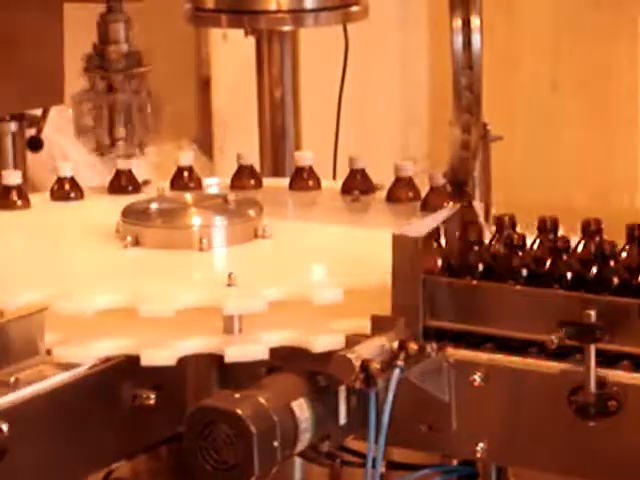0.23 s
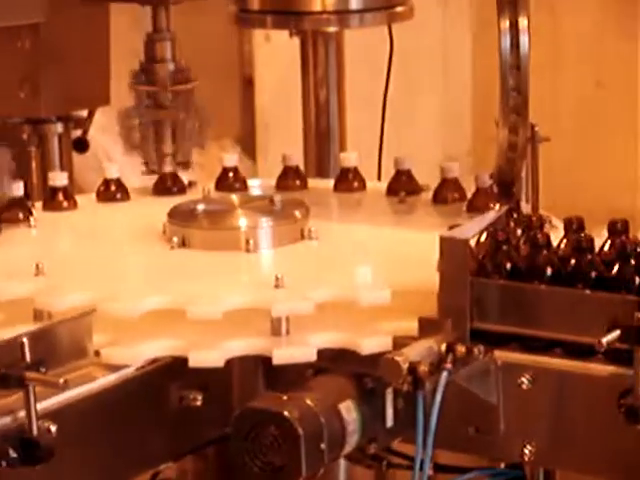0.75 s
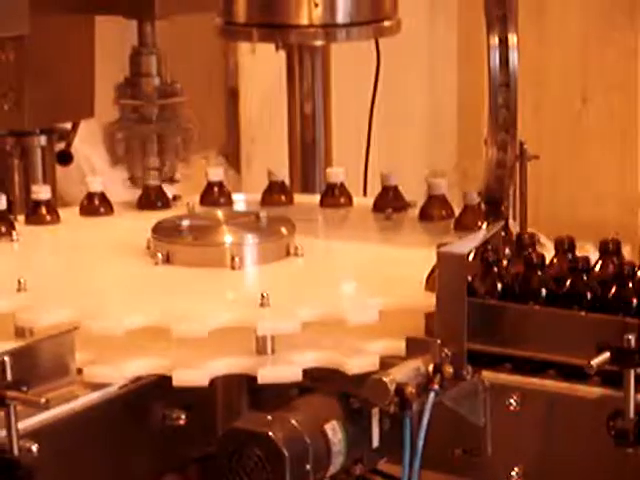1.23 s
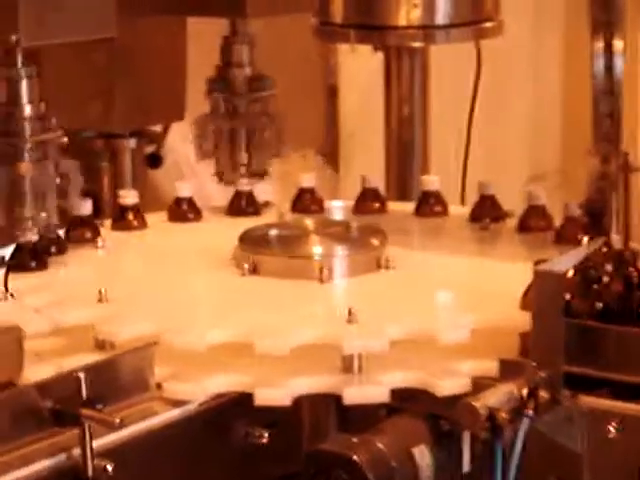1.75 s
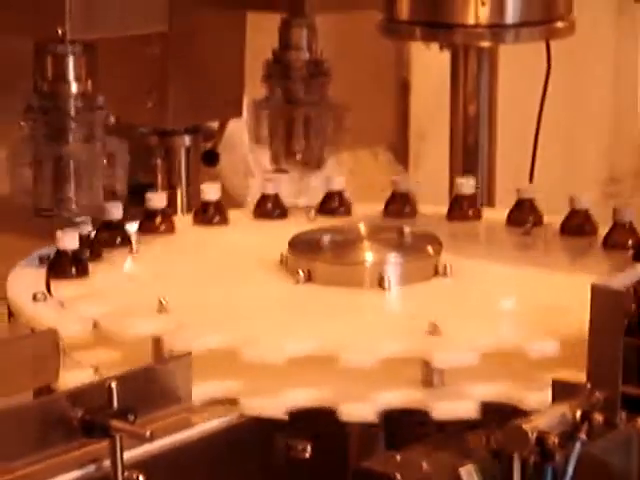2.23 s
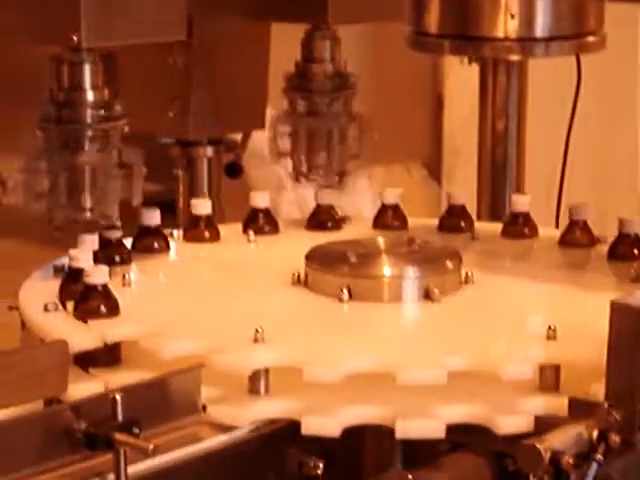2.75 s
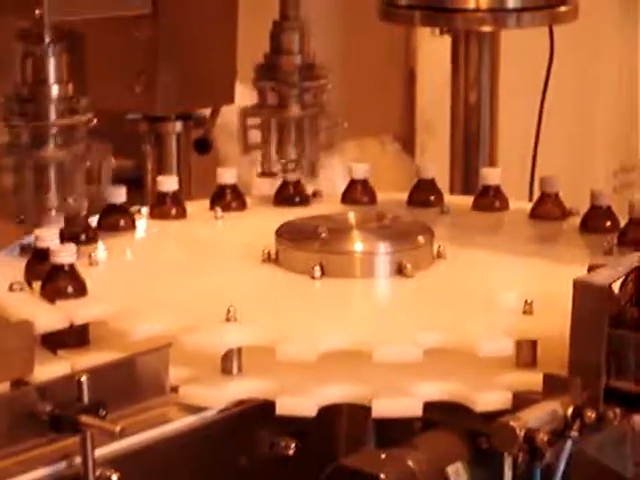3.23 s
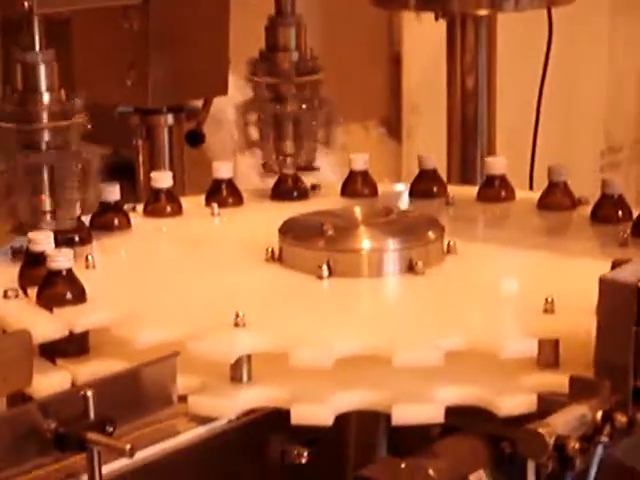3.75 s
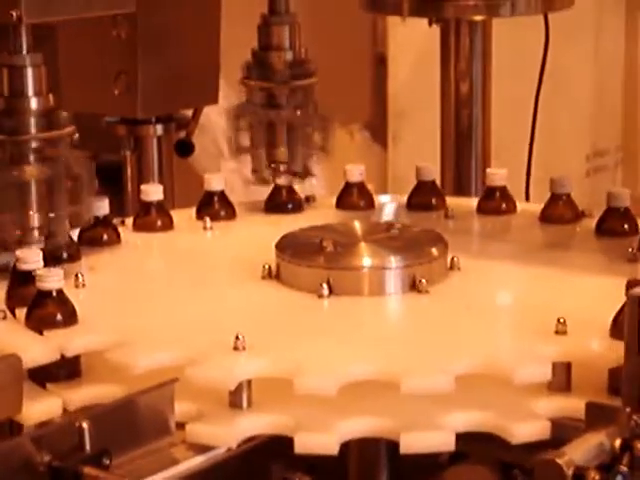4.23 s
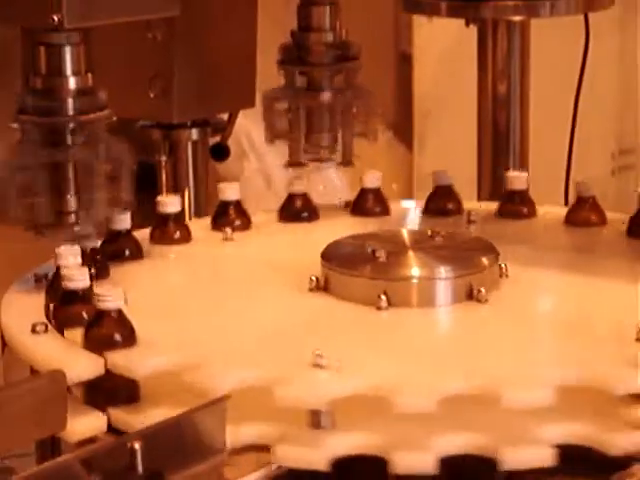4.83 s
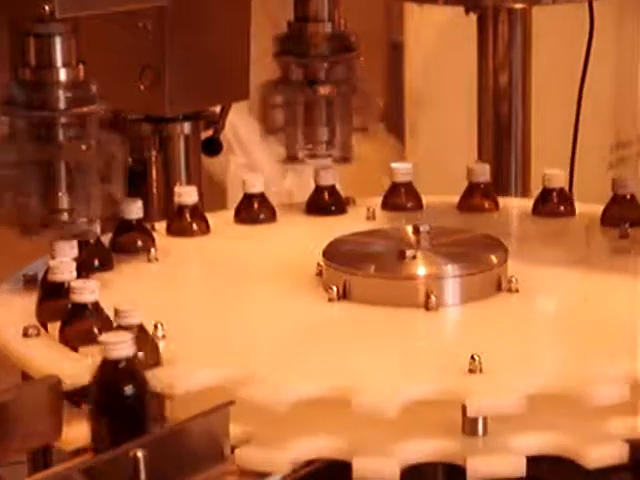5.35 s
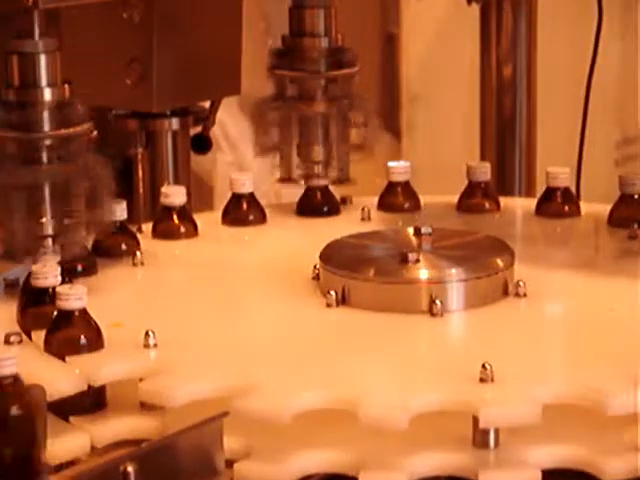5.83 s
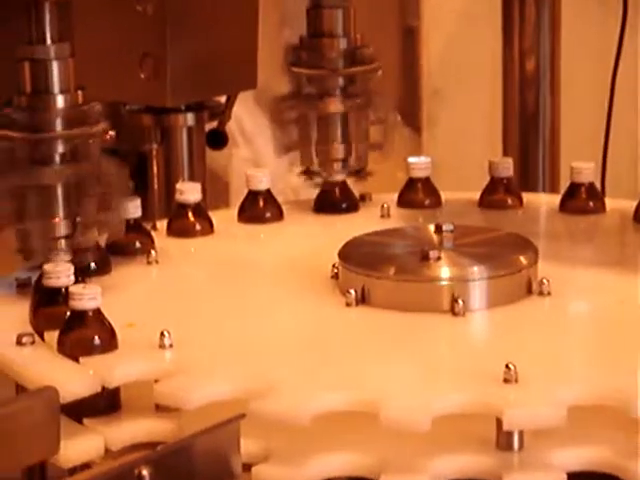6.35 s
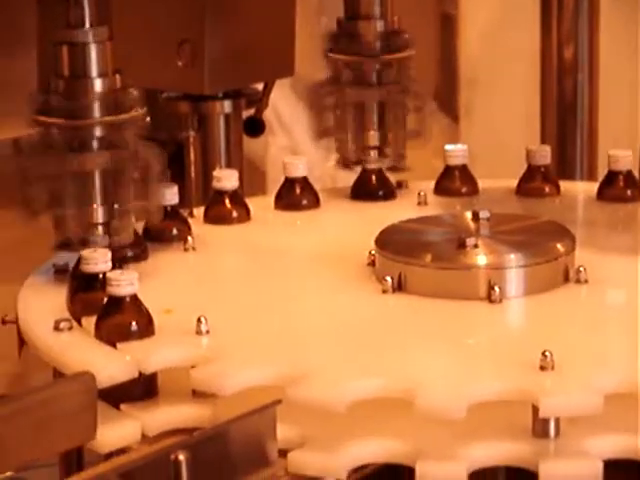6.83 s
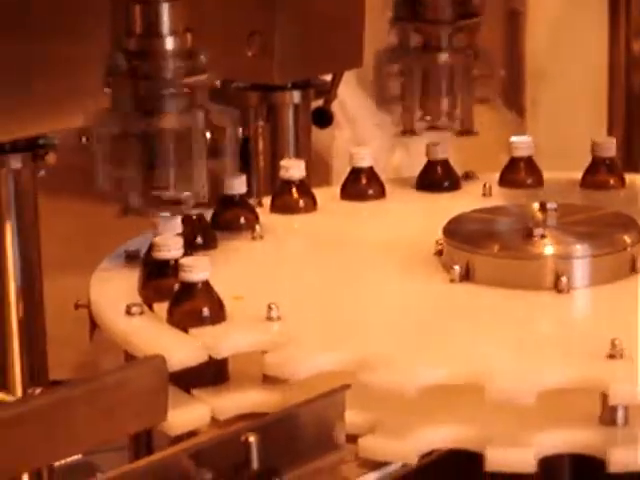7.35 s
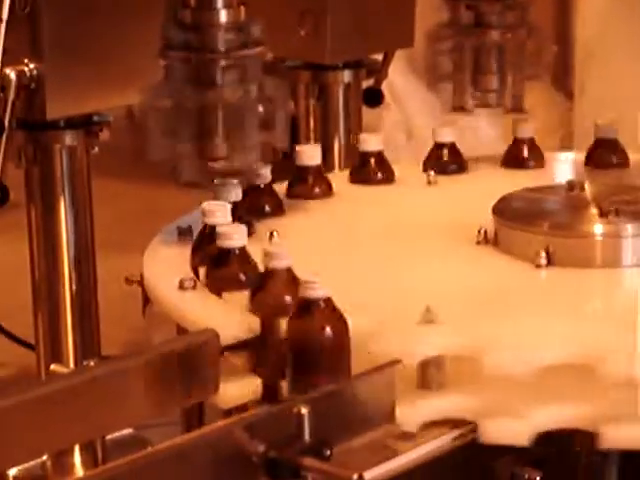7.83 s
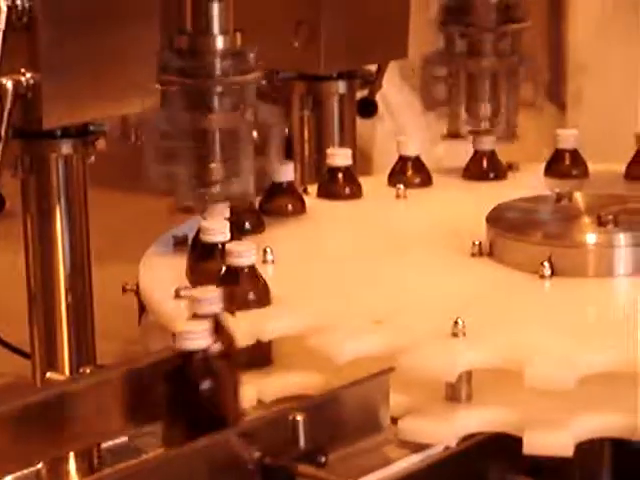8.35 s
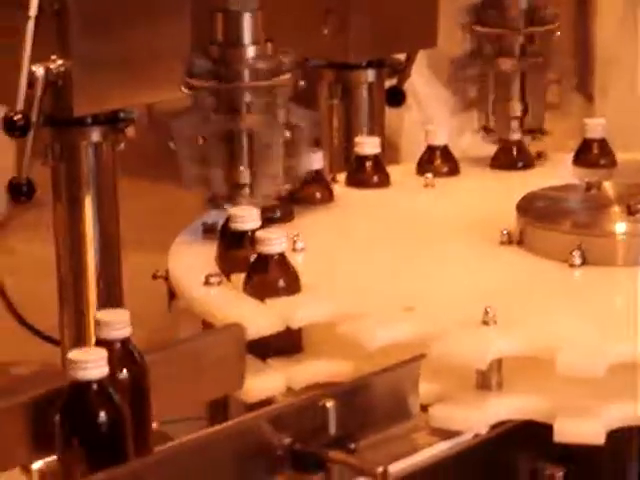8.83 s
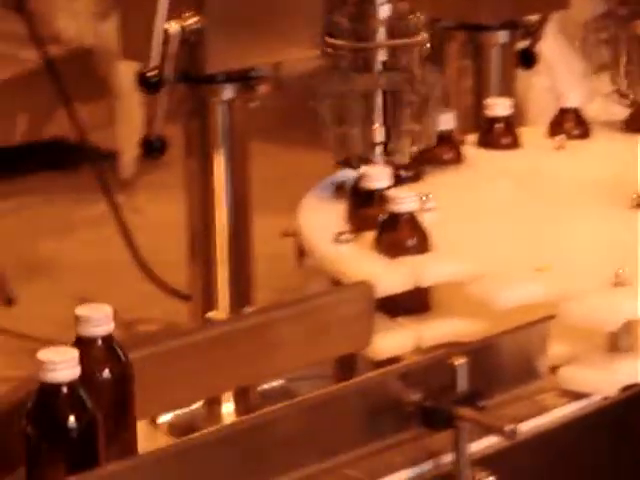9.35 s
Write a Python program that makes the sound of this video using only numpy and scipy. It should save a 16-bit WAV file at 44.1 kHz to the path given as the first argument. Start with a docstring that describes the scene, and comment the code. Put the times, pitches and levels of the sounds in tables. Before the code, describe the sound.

A bottling machine drones steadily in a hard factory hall, glass bottles jostling and knocking, metal ticking, with sharp air exhausts and thumps every few seconds.

```python
"""You hear a motor drone, jostling glass and leaking air throughout, with clicks, knocks and air exhausts among them.
A filling and capping machine steps about every 2.7 s in a hard factory hall, heard by a small microphone.
Filtered noise makes motors, gears, the sliding belt and leaking air; glass contacts and knocks add short sine rings.
Noise bursts make air vents and metal ticks; decaying sines ring the steel frame and one free bottle."""
import sys
import numpy as np
from scipy import signal
from scipy.fft import rfft, irfft, next_fast_len
from scipy.io import wavfile
from scipy.ndimage import map_coordinates

SR = 44100
rng = np.random.default_rng(int(sys.argv[2]) if len(sys.argv) > 2 else 0)


def put_to_file(sound):
    """Save the sound as 16-bit audio at rate SR, in the file named by the first command-line argument."""
    columns = np.atleast_2d(sound).T  # one column per channel
    safe = np.clip(columns, -1, 1)
    whole_steps = np.round(safe * 32767)
    wavfile.write(sys.argv[1], SR, whole_steps.astype(np.int16))


N = 422919  # length in samples

# Spectrum of the steady far plant: pitch_hz, relative_level_db
HALL_SPECTRUM = [(24, -63.5), (40, -27.5), (59, -25), (97, -17.5), (300, -4.5), (390, -27.5), (660, -120)]
# Spectrum of the machine's motors: pitch_hz, relative_level_db
MOTOR_SPECTRUM = [(130, -34), (220, -16), (296, -16.5), (333, -7), (544, -7), (619, -10), (809, -7.5),
                  (973, -9.5), (1130, -6), (1520, -8), (2000, -5), (2600, -12.5), (4400, -120)]
# Unsteady gear tones: pitch_hz, width_hz, level_db
GEAR_TONES = [(328, 18, -46), (802, 57, -48.5)]
# Spectrum of the belt sliding on its rails: pitch_hz, relative_level_db
SLIDE_SPECTRUM = [(1940, -31), (3300, 7.5), (3600, -3), (4090, -0.5), (5430, -3.5), (6170, -1.5),
                  (6920, -5), (8650, -41), (9390, -14), (9830, -21), (12800, -49.5), (21600, -120)]
# Levels through each machine cycle: time_after_main_exhaust_s, drone_db, slide_db, leak_db, treble_hiss_db
CYCLE_LEVELS = [(0, -33.5, -40, -32, -47.5), (.1, -29.5, -37, -28, -39), (.35, -29, -37, -36, -47),
                (.65, -26.5, -35.5, -40.5, -47.5), (.8, -27.5, -28, -37, -41), (1.05, -28.5, -33, -32, -41),
                (1.25, -28.5, -35, -38, -45.5), (1.5, -28, -37, -41, -46), (1.8, -25.5, -33, -39.5, -47),
                (1.9, -24.5, -29.5, -38.5, -38.5), (2.1, -24, -31, -37.5, -40),
                (2.35, -26.5, -30.5, -36.5, -44.5), (2.665, -28, -39.5, -42.5, -51.5)]
# Spectrum of the bottles jostling on the belt: pitch_hz, relative_level_db
JOSTLE_SPECTRUM = [(880, -42), (1500, -12), (2530, 2), (3540, -15), (4200, -19), (5460, -63.5),
                   (9240, -120)]
# Jostling bottles over time: time_s, level_db, glass_pitch_hz
JOSTLE_CURVE = [(0.0, -21.5, 2410), (0.16, -22, 2520), (0.21, -22.5, 2370), (0.45, -24, 2534),
                (0.61, -16, 2500), (0.72, -21.5, 2640), (0.85, -21.5, 2463), (1.2, -19, 2550),
                (1.31, -17, 2420), (1.79, -20, 2484), (1.84, -23, 2387), (2.03, -20.5, 2530),
                (2.08, -19.5, 2344), (2.29, -18.5, 2514), (2.51, -18.5, 2412), (3.07, -21, 2450),
                (3.79, -19.5, 2463), (3.9, -18, 2300), (4.11, -18, 2490), (4.25, -22, 2400),
                (4.46, -20, 2450), (4.59, -18.5, 2440), (5.45, -19.5, 2430), (5.69, -20, 2364),
                (5.8, -17.5, 2506), (6.38, -20.5, 2410), (6.78, -18.5, 2473), (6.89, -17, 2540),
                (7.02, -19.5, 2355), (7.16, -21, 2462), (9.48, -19.5, 2486), (9.59, -16, 2400)]
# Jolts of the frame: start_s, level_db, tilt_to_upper_modes_db, ring_length_s
FRAME_JOLTS = [(1.243, -24, 0.5, .3), (3.6, -23.5, -2, .3), (3.931, -25, -6.5, 0.36),
               (4.104, -31, -9.5, .3), (5.46, -35.5, -11, 0.24), (6.583, -25, -9.5, 0.34),
               (6.749, -32, -2, 0.23), (9.193, -18.5, 7.5, 0.13), (9.53, -32, -9.5, .2)]
# Ringing modes of the steel frame: pitch_hz, level_db, time_to_fall_60_db_s
FRAME_MODES = [(2088, 0, 1.1), (2300, -6, .4), (2557, 0, .8)]
# Touches of a free bottle: start_s, level_db, tilt_to_upper_modes_db, ring_length_s
BOTTLE_TOUCHES = [(6.995, -34, 0, .12)]
# Ringing modes of the free bottle: pitch_hz, level_db, time_to_fall_60_db_s
BOTTLE_MODES = [(4370, -1, .6), (5395, 0, 1.2)]
# Bottle against bottle: start_s, ring_level_db, pitch_hz
BOTTLE_KNOCKS = [(0.1353, -6, 2500), (0.4409, -6.5, 2794), (0.705, -5, 2530), (0.9103, -10.5, 2560),
                 (1.091, -6, 2690), (1.119, -6.5, 2490), (1.1925, -8, 2820), (1.2434, -3.5, 2590),
                 (1.276, -3, 2880), (1.3194, -5, 2300), (1.485, -6, 2700), (1.6059, -10, 2650),
                 (3.1348, -12.5, 3030), (3.9017, -5, 2270), (3.9342, -5.5, 2610), (3.9814, -4.5, 2310),
                 (4.7328, -6, 2410), (5.2066, -13, 2240), (5.463, -14.5, 2200), (5.7636, -4, 2560),
                 (6.1654, -8.5, 2500), (6.548, -8, 2580), (6.6361, -4, 2105), (6.749, -2, 2490),
                 (6.7915, -2, 2450), (7.253, -13, 2360), (7.3776, -9, 2570), (7.6414, -9, 2530),
                 (7.7412, -7, 2590), (7.8642, -7, 2560), (8.2836, -8.5, 2490), (8.3157, -10.5, 2510),
                 (8.3726, -7.5, 2410), (8.4033, -13.5, 2500), (8.428, -4, 2440), (8.4951, -10.5, 2820),
                 (8.567, -8, 2340), (8.6639, -7.5, 2550), (9.0264, -10, 2470), (9.1247, -8, 2510),
                 (9.193, -12.5, 2580), (9.3763, -9, 2470), (9.4599, -2.5, 2430), (9.5342, -4.5, 2400)]
# Metal contacts: start_s, crack_level_db, crack_centre_hz, clack_level_db
METAL_TICKS = [(0.0662, -10.5, 7450, -7), (0.4311, -15, 9100, -16), (0.5222, -18, 9000, -11),
               (1.1153, -12.5, 6900, -15), (1.1936, -17, 7070, -17), (1.235, -24.5, 7100, -10.5),
               (1.274, -15, 7450, -13.5), (1.328, -18, 7020, -12.5), (1.4356, -16, 8800, -11),
               (2.3026, -11.5, 7330, -2.5), (2.4203, -20, 6900, -5.5), (2.465, -9, 7000, -6),
               (2.581, -20.5, 8300, -10.5), (2.6016, -12, 7960, -10.5), (2.6364, -26.5, 6600, -8),
               (2.7645, -10.5, 6900, -5.5), (3.1297, -12.5, 7900, -9.5), (3.8604, -14.5, 7360, -5),
               (3.931, -15, 8420, -9.5), (4.0303, -22.5, 6800, -15), (4.103, -14.5, 6760, -8.5),
               (4.2008, -19.5, 7060, -11.5), (4.312, -21.5, 6880, -14), (4.9327, -11, 6900, -8.5),
               (5.0983, -13, 7470, -5), (5.2073, -14, 8200, -5), (5.231, -14, 7850, -10.5),
               (5.4038, -12.5, 7640, -5), (5.7643, -14.5, 8940, -3.5), (6.3048, -18.5, 7370, -11),
               (6.5078, -13.5, 7880, -9.5), (6.5864, -18.5, 7400, -6.5), (6.7014, -21, 8000, -11),
               (6.8712, -16, 8000, -5), (6.9468, -17, 7760, -8.5), (6.9735, -20, 6930, -10),
               (7.6128, -12, 7400, -1), (7.764, -14.5, 7770, -3.5), (7.871, -14.5, 6840, -10.5),
               (7.895, -11, 7420, -6), (8.0576, -13, 7870, -0.5), (8.4237, -18, 8960, -6.5),
               (9.1502, -13, 6760, -10), (9.2196, -20, 8270, -6), (9.3418, -21.5, 6530, -10),
               (9.3773, -18, 7860, -10), (9.4262, -25.5, 6580, -9), (9.4584, -15, 6820, -10)]
# Valve exhausts, main and return in turn: start_s, hiss_level_db, thump_level_db
VALVE_VENTS = [(0.4313, -6.5, -0.5), (1.4705, -11, -15.5), (3.1302, -7.5, 1), (4.1338, -21, -6.5),
               (5.7627, -8, -2.5), (6.766, -20, -15.5), (8.4275, -9.5, -3.5), (9.426, -19, -18)]
# Resonances of the silencer pipe: pitch_hz, width_hz, level_db
SILENCER_PIPES = [(6120, 520, 0), (9250, 900, -5), (7000, 7000, -17)]

CYCLE_S = 2.665  # nominal time from one main exhaust to the next
WHINE_DB, OVERTONE_DB = -10, -11  # relative to the drone, and to the leak's lower tone
VENT_T60_S, KNOCK_T60_S, TICK_T60_S = 0.42, 0.027, 0.079  # time to fall 60 dB
TOP_HZ = 10050  # upper band limit


def amp(db):
    """Turn decibels into an amplitude factor."""
    return 10 ** (np.asarray(db) / 20)


def unit(x):
    """Scale a sound to an rms level of 1."""
    return x / np.sqrt(np.mean(x ** 2) + 1e-20)


def noise():
    """White noise for the whole scene."""
    return rng.standard_normal(N)


def curves(rows):
    """One value per sample for each column after the time."""
    time_s, *columns = np.transpose(rows)
    return [np.interp(np.arange(N) / SR, time_s, column) for column in columns]


def each_cycle(rows):
    """Repeat each column, stretched to fit from one main exhaust to the next."""
    starts = [row[0] for row in VALVE_VENTS[::2]]
    marks = [starts[0] - CYCLE_S, *starts, starts[-1] + CYCLE_S]
    cycles_done = np.interp(np.arange(N) / SR, marks, np.arange(len(marks)))
    place_s = cycles_done % 1 * CYCLE_S
    time_s, *columns = np.transpose(rows)
    return [np.interp(place_s, time_s, column) for column in columns]


def wobble(rate):
    """A smooth random curve with rate knots a second."""
    knots = rng.standard_normal(int(N * rate / SR) + 4)
    return map_coordinates(knots, [np.arange(N) * rate / SR])


def filtered(x, response):
    """Multiply the sound's spectrum by a response of frequency."""
    m = next_fast_len(len(x) + SR // 4)  # room for the ringing to die away
    return irfft(rfft(x, m) * response(np.fft.rfftfreq(m, 1 / SR)), m)[:len(x)]


def coloured(x, points):
    """Shape a sound with a table of spectrum points, then scale it to rms 1."""
    f, db = np.transpose(points)
    return unit(filtered(x, lambda hz: amp(np.interp(np.log(hz + 1), np.log(f + 1), db))))


def resonance(f, hz, width_hz):
    """Response of one resonance: strongest at hz, weaker to both sides."""
    return 1j * f * width_hz / (hz * hz - f * f + 1j * f * width_hz)


def resonant(x, modes):
    """Pass a sound through side-by-side resonances of alternating sign."""
    def response(f):
        return sum((-1) ** k * amp(db) * resonance(f, hz, width_hz)
                   for k, (hz, width_hz, db) in enumerate(modes))
    return filtered(x, response)


def steep(x, hz, width_hz):
    """Pass a sound through the same resonance twice, for steep sides."""
    return filtered(x, lambda f: resonance(f, hz, width_hz) ** 2)


def impacts(rate, spread_db, share):
    """Noise mixed with a share of scattered sharp impacts of uneven size."""
    happens = rng.random(N) < rate / SR
    hits = happens * noise() * amp(spread_db * rng.exponential(size=N))
    share = np.clip(share, 0, 1)
    return np.sqrt(share) * unit(hits) + np.sqrt(1 - share) * noise()


def add(track, start_s, sound):
    """Mix a sound into the track at its start time."""
    part = track[round(start_s * SR):][:len(sound)]
    part += sound[:len(part)]


def burst(t60, rise, hall_db, hall_t60):
    """Noise that starts fast, dies, and lingers in the hall; times in seconds."""
    t = np.arange(SR * 3 // 4) / SR
    shape = amp(-60 * t / max(t60, .005)) + amp(hall_db - 60 * t / hall_t60)
    fade = 1 - t / t[-1]
    return shape * (1 - np.exp(-t / rise)) * fade * rng.standard_normal(len(t))


def hall():
    """The far plant is steady low noise."""
    return amp(-48) * coloured(noise(), HALL_SPECTRUM)


def motors(drone_db, shake):
    """Shaped noise makes the drone, which shakes with the frame; a narrow band adds the drive whine."""
    drone = amp(drone_db + 0.45 * shake) * coloured(noise(), MOTOR_SPECTRUM)
    whine_tone = unit(resonant(noise(), [(1130, 60, 0)]))
    return drone + amp(drone_db + WHINE_DB + 1.5 * wobble(5)) * whine_tone


def gears():
    """Narrow bands of noise make gear tones whose levels waver."""
    out = np.zeros(N)
    for hz, width_hz, db in GEAR_TONES:
        tone = unit(resonant(noise(), [(hz, width_hz, 0)]))
        out += amp(db + 2.5 * wobble(2.42)) * tone
    return out


def sliding_belt(slide_db, shake):
    """Rubbing on the rails makes noise, stirred by the frame and by a faster flutter."""
    return amp(slide_db + 0.79 * shake + 2.4 * wobble(35)) * coloured(noise(), SLIDE_SPECTRUM)


def treble_hiss(treble_hiss_db):
    """A broad treble hiss of filtered noise, with a varying level."""
    return amp(treble_hiss_db + 2.5 * wobble(70)) * unit(steep(noise(), 7800, 4500))


def pipe_tone(hz, width_hz):
    """Noise through a pipe resonance, with a wavering level."""
    return amp(2.5 * wobble(50)) * unit(steep(noise(), hz, width_hz))


def leaking_air(leak_db):
    """Leaking air makes a noisy pipe tone with an overtone."""
    return amp(leak_db) * (pipe_tone(6160, 400) + amp(OVERTONE_DB) * pipe_tone(9150, 700))


def clatter(pitch_hz, rate, spread, cycles, size_db):
    """Many small glass contacts, each a short damped ring near the pitch of the moment."""
    draw = rng.random((1500, 4))  # for each contact: gap, pitch, life, size
    start = (np.cumsum(-np.log(draw[:, 0])) / rate * SR).astype(int)
    start, draw = start[start < N], draw[start < N]
    hz = pitch_hz[start] * np.exp(spread * (2 * draw[:, 1] - 1))
    samples = np.arange(2600)
    turns = hz[:, None] * samples / SR  # vibrations since the contact
    life = cycles * (0.51 + draw[:, 2:3])
    shape = np.exp(-turns / life) * (1 - np.exp(-turns))
    rings = amp(size_db * draw[:, 3:]) * np.sin(2 * np.pi * turns) * shape
    places = start[:, None] + samples
    return unit(np.bincount(places.ravel(), rings.ravel())[:N])


def jostling_bottles(shake):
    """Bottles on the belt mix a bumpy roar with many small glass rings."""
    jostle_db, glass_hz = curves(JOSTLE_CURVE)
    bumps = impacts(900, 2.0, share=0.3)
    roar = amp(-1.5 + 0.68 * shake + 1.57 * wobble(30)) * coloured(bumps, JOSTLE_SPECTRUM)
    glass = amp(-5.5) * clatter(glass_hz, rate=130, spread=0.1784, cycles=42, size_db=6.5)
    return amp(jostle_db) * (roar + glass)


def running():
    """The running machine: the frame's vibration stirs motors, belt and bottles together."""
    drone_db, slide_db, leak_db, treble_hiss_db = each_cycle(CYCLE_LEVELS)
    shake = wobble(10)
    machine = motors(drone_db, shake) + gears() + sliding_belt(slide_db, shake)
    air = treble_hiss(treble_hiss_db) + leaking_air(leak_db)
    return machine + air + jostling_bottles(shake)


def struck(blows, modes):
    """Each blow rings the modes, weighted by its tilt, until the ring is cut short."""
    out, t = np.zeros(N), np.arange(SR) / SR
    weights = np.linspace(-1, 1, len(modes))  # lowest to highest mode
    for start_s, db, tilt_db, held_s in blows:
        ring = np.zeros(len(t))
        for weight, (hz, level_db, t60) in zip(weights, modes):
            ring += amp(level_db + weight * tilt_db - 60 * t / t60) * np.sin(2 * np.pi * hz * t)
        stilled = 1 / (1 + (t / held_s) ** 12)
        add(out, start_s, amp(db) * ring * (1 - np.exp(-t / 0.0027)) * stilled)
    return out


def wheel_stops():
    """The star wheel stops and jolts the steel frame, which rings."""
    return struck(FRAME_JOLTS, FRAME_MODES)


def bottle_clinks():
    """A free bottle is touched and rings briefly."""
    return struck(BOTTLE_TOUCHES, BOTTLE_MODES)


def knocks():
    """Filled bottles are damped: each knock is a short ring and a little noisy rattle."""
    out, t = np.zeros(N), np.arange(SR * 3 // 4) / SR
    for start_s, db, hz in BOTTLE_KNOCKS:
        decay = amp(-60 * t / max(KNOCK_T60_S, .005))
        ring = decay * np.sin(2 * np.pi * hz * t) * (1 - np.exp(-t / 0.00031))
        rattle = steep(burst(2 * KNOCK_T60_S, 0.00029, -23.5, 0.4), hz, 1200)
        add(out, start_s, amp(db) * (ring + 1.3 * rattle))
    return out


def ticks():
    """Cams and capping heads rattle as metal meets: a bright crack over a shorter, duller clack."""
    bright, dull = np.zeros(N), np.zeros(N)
    for start_s, db, hz, clack_db in METAL_TICKS:
        crack = steep(burst(TICK_T60_S, 0.0005, -16, .6), hz, 2400)
        add(bright, start_s, amp(db) * crack)
        add(dull, start_s, amp(clack_db) * burst(0.049, .001, -17.5, 0.36))
    rattle = amp(2.2 * wobble(150))
    return rattle * bright + steep(rattle * dull, 3470, 1100)


def vents():
    """Each exhaust hisses through the silencer pipe while the cylinder slams to its stop."""
    air, slam = np.zeros(N), np.zeros(N)
    for start_s, hiss_db, thump_db in VALVE_VENTS:
        add(air, start_s, amp(hiss_db) * burst(VENT_T60_S, 0.0022, -16, 5.0))
        add(slam, start_s, amp(thump_db) * burst(0.16, 0.001, -19, .8))
    hiss = sum(amp(db) * steep(air, hz, width_hz) for hz, width_hz, db in SILENCER_PIPES)
    thump = resonant(slam, [(1390, 740, -5.0), (2640, 410, 4.5)])
    return hiss + thump


def scene():
    """Mix all the layers into one channel."""
    background = hall() + running()
    return (background + wheel_stops() + bottle_clinks() + knocks() + ticks() + vents())[None]


def record(dry):
    """The small microphone drops bass, gain control ducks loud moments, peaks round off, top is cut."""
    x = signal.lfilter(*signal.butter(2, 55, "high", fs=SR), dry[0])
    keep = np.exp(-1 / (.06 * SR))  # power is averaged over about 0.06 s
    power = signal.lfilter([1 - keep], [1, -keep], x ** 2, zi=[np.mean(x ** 2)])[0]
    x = x * (power / np.mean(power)) ** -.15
    x = x / (1 + np.abs(x / .78) ** 6) ** (1 / 6)
    return filtered(x, lambda hz: 1 / (1 + (hz / TOP_HZ) ** 300))[None]


dry = scene()
out = record(dry)
put_to_file(out)
```